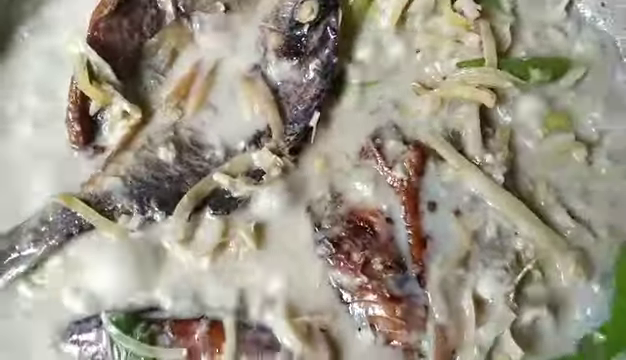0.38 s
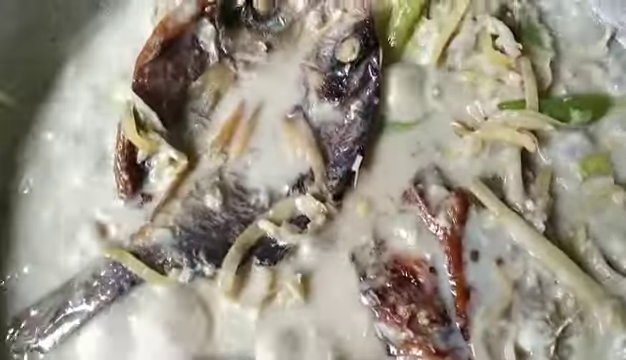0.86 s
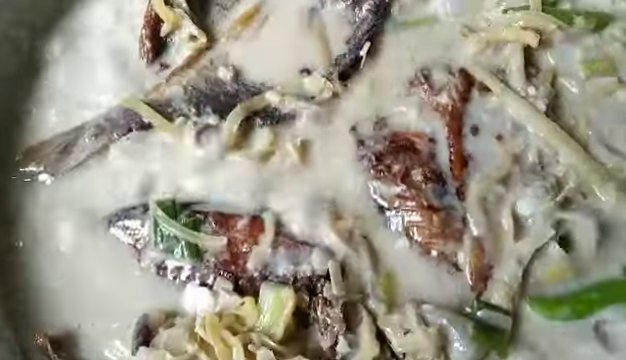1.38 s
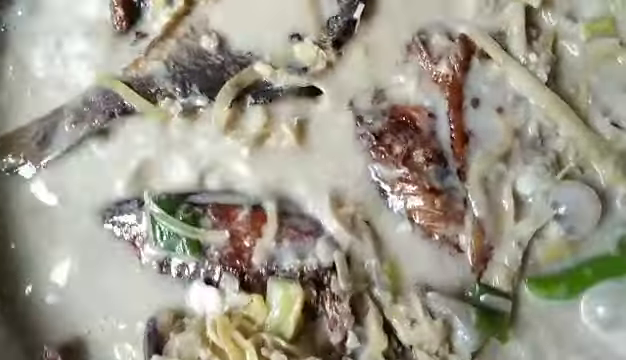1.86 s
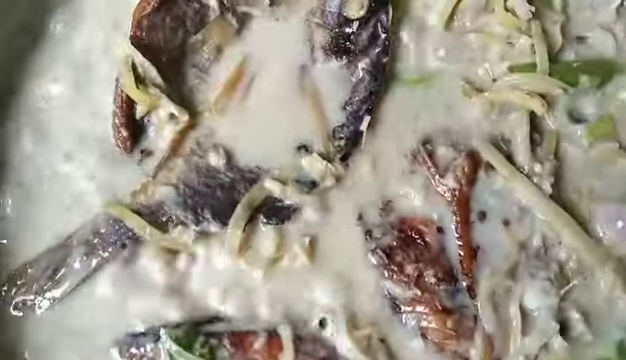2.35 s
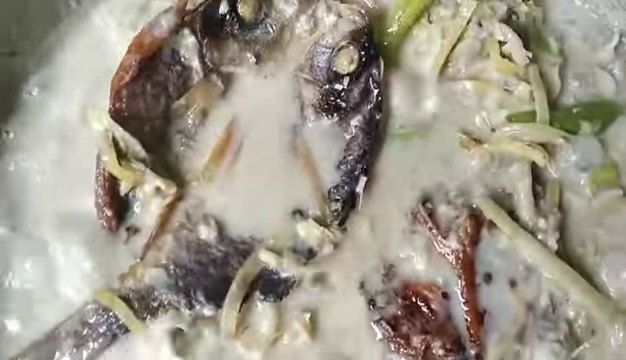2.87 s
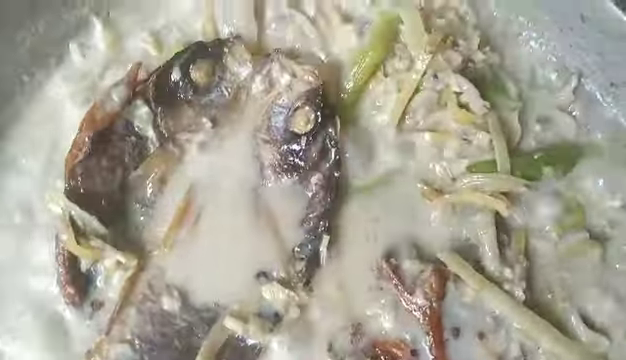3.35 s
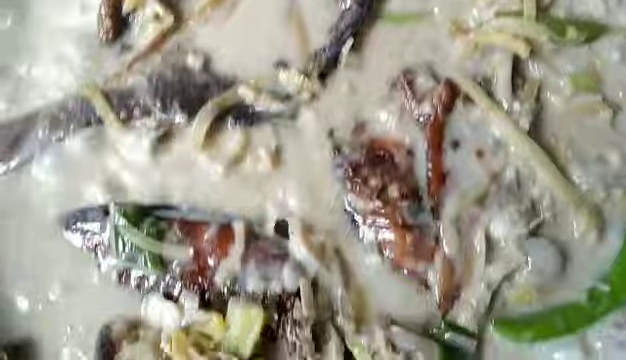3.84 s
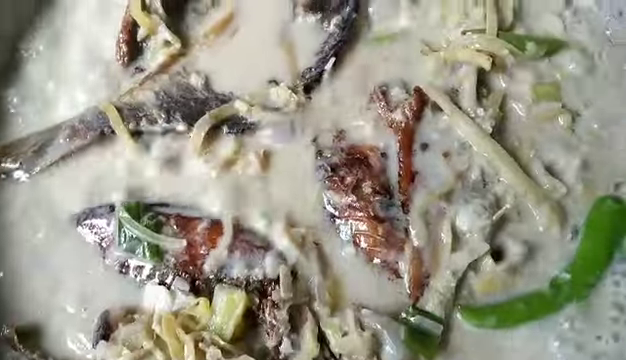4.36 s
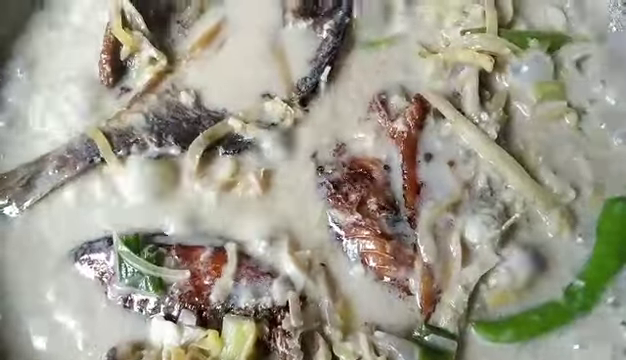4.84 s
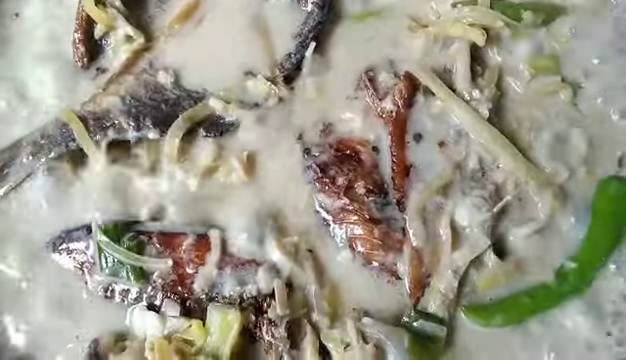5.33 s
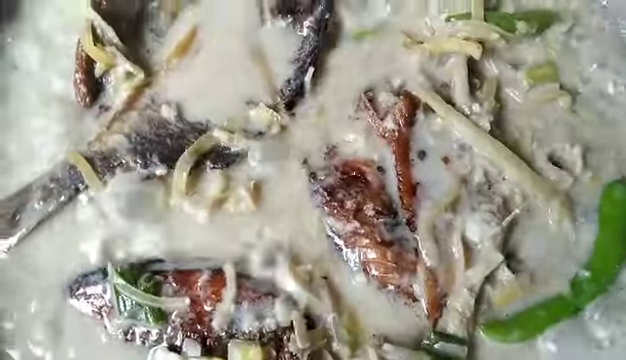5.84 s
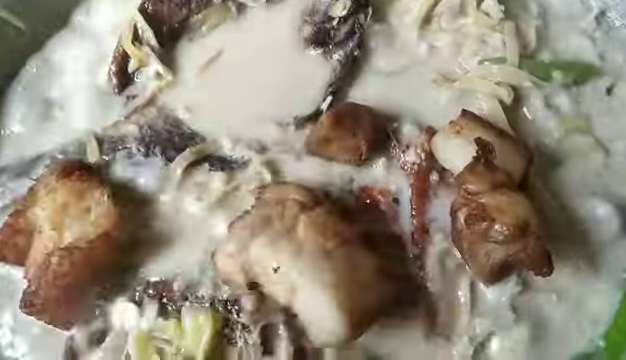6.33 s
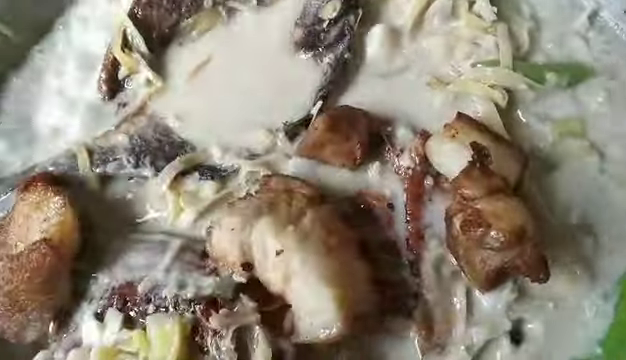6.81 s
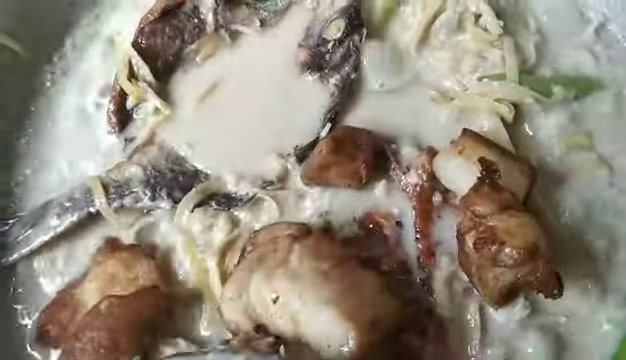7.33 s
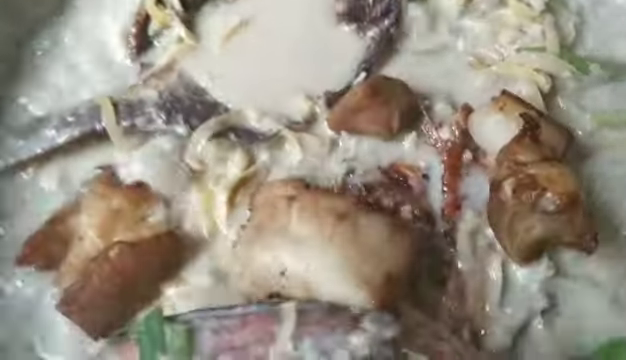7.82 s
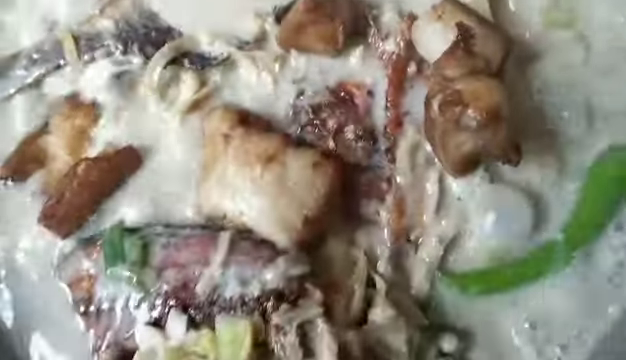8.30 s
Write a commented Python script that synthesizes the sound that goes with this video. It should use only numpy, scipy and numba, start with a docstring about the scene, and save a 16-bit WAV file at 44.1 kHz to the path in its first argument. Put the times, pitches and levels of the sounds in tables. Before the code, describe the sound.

A steady sizzling simmer of fat gurgling bubbles and wet pops over a low burner roar, opening with metallic clinks and squeaks, broken by two tiny gaps.

```python
"""Fat bubbles gurgle in a thick sauce in a wide metal pan, heard close up in three shots split by silences:
decaying sines for the bubbles, snaps and pops, short noise for ticks and spray. Swarms of tiny sines make
gurgle, fizz and steam; noisy tones whistle from vents. Below lie a burner's roar (resonant noise) and a
mains hum (sine). In the first shot utensils clink (noise through metal modes) and squeal in a kitchen."""
import sys
import numpy as np
from scipy import signal
from scipy.fft import rfft, irfft, next_fast_len
from scipy.io import wavfile
from scipy.ndimage import uniform_filter1d
from numba import njit

SR = 44100
rng = np.random.default_rng(int(sys.argv[2]) if len(sys.argv) > 2 else 0)


def transcribe(signal):
    """Save signal, clipped to [-1, 1], as a 16-bit WAV file at the path in sys.argv[1]."""
    frames = np.atleast_2d(signal).T
    limited = np.clip(frames, -1, 1)
    pcm = np.round(limited * 32767).astype(np.int16)
    wavfile.write(sys.argv[1], SR, pcm)


def level_to_linear(level):
    """Convert decibel levels to linear amplitude factors, elementwise."""
    exponent = np.asarray(level, float) / 20
    return 10 ** exponent


N = 383229
T = np.arange(N) / SR

# audible stretches: start/s, end/s
SHOTS = [(0, 1.349), (1.451, 6.066), (6.131, 8.69)]
# depth of narrow streaks in the swarms: gurgle/dB, fizz/dB, steam/dB
STREAK_DB = (1.7, 3.0, 3.4)


def level(x, db):
    """Scale to an rms level."""
    return x * level_to_linear(db) / np.sqrt(np.mean(x ** 2))


def shape(x, gain):
    """Filter by a gain that is a function of frequency."""
    size = next_fast_len(len(x))
    hz = np.maximum(np.arange(size // 2 + 1) * SR / size, 1)
    return irfft(rfft(x, size) * gain(hz), size)[:len(x)]


def band(lo_hz, hi_hz, order=4):
    """Gain of a band-pass with soft skirts."""
    return lambda hz: 1 / np.sqrt((1 + (lo_hz / hz) ** (2 * order)) * (1 + (hz / hi_hz) ** (2 * order)))


def walk(rate_hz):
    """Random levels held 1 / rate_hz and slewed twice; spread near 1."""
    k = int(SR / rate_hz)
    steps = np.repeat(rng.standard_normal(N // k + 1), k)
    return 1.64 * uniform_filter1d(uniform_filter1d(steps, k), k)[:N]


def by_shot(values):
    """Join one value or curve per shot; zero between shots."""
    return sum(v * ((T >= a) & (T < b)) for v, (a, b) in zip(values, SHOTS))


@njit
def rings(s, hz, t60_s, size, glide, rise, rate, count):
    """Sum of sines that swell for the share rise of t60; the pitch moves by the share glide over t60."""
    out = np.zeros(count)
    for k in range(len(s)):
        start, steps = int(s[k] * rate), int(t60_s[k] * rate)
        fade, phase = np.exp(-np.log(1000) / steps), 0.
        g = size[k]
        for i in range(min(steps, count - start)):
            out[start + i] += g * min(1., i / (rise * steps)) * np.sin(phase)
            phase += 2 * np.pi * hz[k] * (1 + glide * i / steps) / rate
            g *= fade
    return out


def scatter(lo_hz, hi_hz, mean_db, quarter_range_db, count):
    """Rows of (t/s, level/dB, f/Hz) at random moments."""
    u = rng.random((count, 3)).T
    s = .1 + u[0] * (N / SR - .1)
    db = mean_db + quarter_range_db * 2 * (2 * u[1] - 1)
    hz = lo_hz * (hi_hz / lo_hz) ** u[2]
    return np.transpose([s, db, hz])


def bloops():
    """Fat bubbles in the thick sauce ring low, down 60 dB in 14.5 cycles, with rising pitch."""
    # fat bubbles at set moments: t/s, relative level/dB, f/Hz
    fat = [(0.117, -21.5, 1280), (0.164, -21, 1500), (0.239, -25, 1324), (0.414, -25, 1210),
           (1.081, -20, 1610), (1.235, -23, 1500), (1.276, -36, 1535), (1.577, -33.5, 1520),
           (1.625, -26, 1970), (1.674, -26, 1810), (1.754, -26, 850), (1.892, -19.5, 1750),
           (1.905, -20.5, 1840), (2.075, -29, 1670), (2.217, -29, 1280), (2.632, -27, 1620),
           (2.72, -31, 1640), (2.665, -24, 2500), (2.861, -29, 1340), (3.036, -23.5, 1280),
           (3.088, -27, 1620), (3.222, -32, 1350), (3.384, -30, 1040), (3.452, -30, 1450),
           (3.505, -28, 1250), (3.592, -25, 1670), (3.765, -31, 1620), (3.851, -23, 1410),
           (3.956, -24, 1580), (4.023, -30, 2370), (4.133, -27, 2090), (4.19, -27, 1260),
           (4.442, -27, 1480), (4.461, -27, 1450), (4.542, -26.5, 1800), (4.61, -23, 2500),
           (4.78, -27, 1600), (4.819, -24.5, 1400), (4.912, -23, 1450), (5.022, -31, 1620),
           (5.193, -32, 1570), (5.237, -26, 1030), (5.377, -28, 1470), (5.495, -19.5, 1680),
           (5.577, -23, 1600), (5.604, -29, 1460), (5.697, -28, 1140), (5.712, -24, 1450),
           (5.747, -26, 2280), (6.018, -25, 1560), (6.308, -17, 1520), (6.604, -26, 1300),
           (6.614, -23, 1900), (6.772, -24.5, 1570), (6.425, -25, 760), (7.069, -30, 1990),
           (7.087, -26, 2000), (7.112, -28, 670), (7.144, -28, 1400), (7.216, -25, 1500),
           (7.397, -28.5, 760), (7.739, -29, 1950), (7.333, -25.5, 1230), (7.79, -23.5, 1310),
           (7.864, -20.5, 1570), (7.914, -23, 1790), (7.928, -24, 1980), (7.935, -28, 1800),
           (8.053, -27, 1300), (8.068, -27, 1350), (8.18, -28, 1280), (8.099, -22.5, 1730),
           (8.282, -25, 1260), (8.341, -22.5, 1260), (8.479, -23.5, 1260), (8.523, -30, 770),
           (8.588, -26, 1340), (8.65, -26, 1070)]
    # chance bubbles: low f/Hz, high f/Hz, mean relative level/dB, quarter of level range/dB
    small = (1003, 1650, -33.5, 1)
    s, db, hz = np.vstack([fat, scatter(*small, count=12)]).T
    return rings(s, hz, 14.5 / hz, level_to_linear(db + 4.0), 0.12, 0.12, 1. * SR, count=N)


def snaps():
    """Thick skins snap in a cycle or two at the bubble's pitch and leave a wet tail of noise around it."""
    # snapping skins: t/s, relative level/dB, f/Hz
    skins = [(6.3901, -15, 2200), (6.4688, -11, 2300), (8.001, -12, 1450), (4.4110, -26, 1400),
             (4.4165, -28, 1500), (6.309, -23, 1500), (6.402, -21, 1800), (6.462, -22, 1700),
             (6.605, -24, 2000), (6.773, -27, 2000), (6.842, -23, 2200), (7.115, -24, 900)]
    t60_cycles, tail_db, tail_decay_s = 4.5, -16, .012
    s, db, hz = np.transpose(skins)
    out = rings(s, hz, t60_cycles / hz, level_to_linear(db + 4), -0.1, 0.06, 1. * SR, count=N)
    out = shape(out, band(650, 9000, order=2))
    t = T[:SR // 10]
    for k, noise in enumerate(rng.standard_normal((len(s), len(t)))):
        at = int(s[k] * SR)
        splash = level(shape(noise, band(hz[k] / 2.0, hz[k] * 1.4)), db[k] + tail_db)
        out[at:at + len(t)] += splash * np.exp(-t / tail_decay_s)
    return out


def pops():
    """The skin stretches with a swelling hiss, bursts in a few cycles at its pitch and leaves a spray."""
    # bursting bubbles at set moments: t/s, relative level/dB, f/Hz
    bursting = [(1.5857, -18, 5500), (1.785, -22, 2240), (1.9785, -16.5, 6300), (2.1359, -20, 5270),
                (2.526, -21, 5940), (2.7196, -29, 3900), (2.737, -14.5, 4300), (4.8905, -22.5, 4170),
                (5.0498, -27, 4940), (5.1005, -23, 4300), (5.1933, -22, 2040), (6.4722, -21, 5000),
                (7.1177, -13, 5200), (7.7476, -36, 4560), (7.7662, -8.5, 3960), (7.776, -18, 4200),
                (7.9257, -18, 5100), (8.1518, -22, 4730), (8.2745, -17, 7550), (8.2967, -11, 4600),
                (8.2985, -23, 3020), (8.6634, -22, 4930)]
    # chance pops: low f/Hz, high f/Hz, mean relative level/dB, quarter of level range/dB
    small = (2398, 9593, -25, 1)
    spray_t60_s, swell_s = 0.05, 0.0064
    s, db, hz = np.vstack([bursting, scatter(*small, count=12)]).T
    out = rings(s, hz, 5.7 / hz + 0.0045, level_to_linear(db + 4.0), 0.14, 0.17, 1. * SR, count=N)
    noise = rng.standard_normal((len(s), SR // 4))
    lead = SR // 20
    t = T[:SR // 4] - lead / SR  # zero at the burst
    swell = level_to_linear(-2.0) * np.exp(np.minimum(t, 0) / swell_s)
    fade = np.where(t < 0, swell, np.exp(-np.log(1000) * t / spray_t60_s))
    for k in range(len(s)):
        colour = band(hz[k] / 1.4, min(hz[k] * 1.17, 10200), order=4)
        spray = level(shape(noise[k], colour), db[k] - 13.5) * fade
        at = int(s[k] * SR) - lead
        out[at:at + SR // 4] += spray[:N - at]
    return out


def ticks():
    """Tiny bubbles burst in one dry tick: about a millisecond of noise around the bubble's pitch."""
    # bursting tiny bubbles: t/s, peak/dB, f/Hz
    tiny = [(1.8340, -15, 9800), (1.8778, -19, 5600), (2.0612, -20, 9600), (2.217, -15, 8800),
            (2.399, -16.5, 9400), (3.103, -11, 9500), (3.3737, -20, 8900), (3.5957, -16, 9250),
            (5.374, -19, 7900), (5.582, -16, 8400), (5.7572, -20, 9800), (5.9682, -18, 9600),
            (6.2003, -18, 9420), (6.2453, -15, 9700), (6.781, -22, 9150), (7.2328, -19, 8380),
            (7.765, -13, 9300), (7.9465, -31, 5000), (7.957, -24, 5000), (8.0994, -18.5, 9260),
            (8.1995, -31, 4800), (8.1125, -20.5, 8500), (8.208, -15.5, 8900), (8.282, -15.5, 6300),
            (8.4924, -17, 8750)]
    decay_s = 0.00087
    t = T[:SR // 100]
    out = np.zeros(N)
    for (s, db, hz), noise in zip(tiny, rng.standard_normal((len(tiny), len(t)))):
        tick = shape(noise * t * np.exp(-t / decay_s), band(hz / 1.15, hz * 1.15))
        at = int(s * SR)
        out[at:at + len(t)] += level_to_linear(db) * tick / np.abs(tick).max()
    return out


def gurgle():
    """Low swarm of tiny bubbles in the sauce."""
    # low f/Hz, high f/Hz, grains/s, t60/4.03 cycles, size spread/dB, noise less 5/dB, patchiness/dB
    low_swarm = (805, 2519, 400, 5.5, 2.8, 3.5, 1.7)
    return bubbles(*low_swarm, STREAK_DB[0])


def fizz():
    """Middle swarm: fizzing froth."""
    # low f/Hz, high f/Hz, grains/s, t60/4.03 cycles, size spread/dB, noise less 5/dB, patchiness/dB
    middle_swarm = (2494, 5958, 1500, 5.5, 0.5, -2.5, 0.5)
    return bubbles(*middle_swarm, STREAK_DB[1])


def steam():
    """High swarm: hissing steam."""
    # low f/Hz, high f/Hz, grains/s, t60/4.03 cycles, size spread/dB, noise less 5/dB, patchiness/dB
    high_swarm = (6750, 13160, 2500, 5.2, 7.5, 7.5, 1.8)
    return bubbles(*high_swarm, STREAK_DB[2])


def bubbles(lo_hz, hi_hz, grains_per_s, decay, spread_db, noise_db, patchy_db, streak_db):
    """A swarm of tiny bubbles, a few loud and many faint, over the blur of far ones."""
    u = rng.random((int(round(grains_per_s, -2) * N / SR), 3)).T
    hz = 0.806 * lo_hz * (1.432 * hi_hz / lo_hz) ** u[1]
    size = level_to_linear(-spread_db * np.log(np.maximum(u[2], .005)))
    near = rings(u[0] * N / SR, hz, 4.03 * decay / hz, size, 0.13, 0.67, 1. * SR, count=N)
    far = level(rng.standard_normal(N), noise_db + 5.0)
    mix = shape(shape(level(near, 0) + far, band(lo_hz, hi_hz)), pan_colour)
    # broad random patches, then narrow random streaks
    mix = patchy(mix, patchy_db, size=512, bins=6, frames=9)
    mix = patchy(mix, streak_db, size=1024, bins=2, frames=3)
    return level(mix, 0)


def patchy(x, patchy_db, size, bins, frames):
    """Level wanders at random in patches of pitch and time."""
    z = signal.stft(x, nperseg=size)[2]
    field = rng.standard_normal(z.shape)
    for _ in range(2):
        field = uniform_filter1d(uniform_filter1d(field, bins, axis=0), frames, axis=1)
    return signal.istft(z * level_to_linear(patchy_db * field / field.std()), nperseg=size)[1][:N]


def pan_colour(hz):
    """Gain of pan, room and microphone, interpolated over log frequency."""
    # f/Hz, relative gain/dB
    colour = [(53, -71), (90, -50), (108, -14), (247, -15), (302, 1.5), (378, -23), (453, -7), (651, -9.5),
              (797, -17), (1620, -12.5), (2730, -12.5), (4170, -6), (9360, 3), (10200, -0.5), (10700, -16),
              (11200, -30), (14600, -60.5), (22000, -120)]
    f, db = np.transpose(colour)
    return level_to_linear(np.interp(np.log(hz), np.log(f), db))


def opening(excess_db):
    """Level in dB of the fade-in, the loud stretch and the drop after each join."""
    # start/s, fade length/s, drop/s
    joins = [(1.451, 0.29, 1.97), (6.13, 0.19, 6.63)]
    fade_from_db, drop_length_s = -13.5, 0.0054
    total_db = 0
    for s, fade, drop in joins:
        times = [s, s, s + fade / 4, s + fade, drop, drop + drop_length_s]
        rise_db = [fade_from_db + excess_db, fade_from_db / 2 + excess_db, excess_db]
        total_db = total_db + np.interp(T, times, [0, *rise_db, excess_db, 0])
    return total_db


def boil_levels():
    """Slow level, opening, boil-ups, surges (shared by fizz and steam) and each layer's own flicker, in dB."""
    # slow levels, one list a shot: t/s, level/dB
    roar_curve, gurgle_curve = [
        [(0, -41.5), (.27, -38.5), (.4, -41), (.7, -46), (1.0, -41), (1.35, -42)],
        [(2.0, -47), (2.12, -41), (2.25, -42), (2.4, -40.5), (2.9, -46), (3.15, -42.5), (3.45, -43.5),
         (3.6, -42), (4.0, -45), (4.45, -44), (4.7, -42), (4.95, -46), (5.1, -43.5), (5.25, -46), (5.6, -45),
         (5.9, -41), (6.07, -42)],
        [(6.6, -51.5), (6.68, -49), (7.0, -42), (7.3, -44), (7.5, -46.5), (7.65, -42.5), (8.1, -43.5),
         (8.69, -43)],
    ], [
        [(0.0, -38.5), (1.164, -40.5), (1.34, -39.5)],
        [(2.0, -44.5), (2.36, -45), (2.65, -43.5), (5.14, -41.5), (5.83, -43), (6.05, -42.5)],
        [(6.66, -43.5), (6.84, -44), (7.91, -41), (8.32, -42), (8.69, -41.5)],
    ]
    sizzle_curve = [
        [(0.0, -35.5), (0.17, -37.5), (1.006, -38), (1.19, -37), (1.3, -36.5)],
        [(2.0, -37.5), (2.2, -36), (2.83, -35), (3.79, -34), (4.05, -38), (4.27, -39.5), (5.2, -35),
         (5.62, -35), (5.9, -36), (6.02, -35)],
        [(6.66, -37), (7.37, -33.5), (7.7, -36.5), (8.15, -31.5), (8.32, -37), (8.66, -33.5)],
    ]
    # level over the sizzle, one a shot: level/dB
    fizz_over, steam_over = [0, -3.5, -5], [-2, -3.5, -4]
    # froth boils up or settles for a moment: middle t/s, length/s, gurgle/dB, sizzle/dB
    boil_ups = [(0.262, .05, -2.5, -3), (1.04, 0.1, -1.5, 4.5), (1.576, 0.021, 8.5, -4),
                (1.916, 0.054, 0, 3.5), (2.11, 0.069, -1, 2.5), (2.597, 0.16, 0, 2.5), (4.35, 0.044, 0, 4),
                (4.603, 0.14, -2, 2), (5.11, 0.052, 3.5, 2), (6.032, 0.048, 1.5, 2), (6.335, 0.086, 6, 5),
                (6.48, 0.04, 0, 5), (6.587, 0.13, -3, 1), (6.802, 0.074, 7, 1.5), (7.163, 0.23, 6, 1),
                (7.418, 0.088, 2, 3), (7.573, 0.026, 3, 2), (7.778, 0.028, 6.5, 6), (8.116, 0.073, 7, 1),
                (8.232, 0.11, -5, 0.5), (8.306, 0.049, 7, 4.5)]
    # excess before the drop: roar/dB, gurgle/dB, fizz/dB, steam/dB
    excess = (8.6, 5.75, 4.8, 4.3)
    # spread of surges and of flicker: roar/dB, gurgle/dB, fizz/dB, steam/dB
    surge_spread, flicker_spread = (1, 0.88, 0.83, 0.81), (1.44, 0.8, 0.79, 0.87)
    surge_hz, flicker_hz = 7.6, 25

    roar_db, gurgle_db, sizzle_db = (by_shot([np.interp(T, *np.transpose(rows)) for rows in curve])
                                     for curve in (roar_curve, gurgle_curve, sizzle_curve))
    for s, length, gurgle_up_db, sizzle_up_db in boil_ups:
        bump = np.exp(-(2 * (T - s) / length) ** 2)
        gurgle_db = gurgle_db + gurgle_up_db * bump
        sizzle_db = sizzle_db + sizzle_up_db * bump
    slow = roar_db, gurgle_db, sizzle_db + by_shot(fizz_over), sizzle_db + by_shot(steam_over)
    audible = by_shot([1, 1, 1]) > 0
    surges = [walk(surge_hz) for _ in range(3)]
    surges.append(surges[-1])
    levels = []
    for db, up_db, surge_db, surge, flicker_db in zip(slow, excess, surge_spread, surges, flicker_spread):
        base_db = np.where(audible, db, -60) + opening(up_db)
        levels.append(base_db + surge_db * surge + flicker_db * walk(flicker_hz))
    return levels


def whistle(rows, orders, blur_hz, breath):
    """A tone on a pitch curve; the share breath is noise spread about blur_hz either side of the pitch."""
    s, hz, db = np.transpose(rows)
    span = slice(max(int(s[0] * SR), 0), int(s[-1] * SR))
    t = T[span]
    phase = np.cumsum(np.interp(t, s, hz)) * 2 * np.pi / SR
    share = np.clip(breath, 0, 1)
    tone = 0
    for k, order_db in [(0.99, 0.0031)] + orders:  # frequency ratio, dB
        blur = band(.1, k * blur_hz, order=2)
        a, b = (level(shape(rng.standard_normal(SR), blur), -4.5)[:len(t)] for _ in range(2))
        in_phase = (np.sqrt(1 - share) + np.sqrt(share) * a) * np.sin(k * phase)
        quadrature = np.sqrt(share) * b * np.cos(k * phase)
        tone = tone + level_to_linear(order_db) * (in_phase + quadrature)
    out = np.zeros(N)
    edges = np.clip(np.minimum(t - s[0], s[-1] - t) / 0.006, 0, 1)
    out[span] = np.sqrt(2) * tone * edges * level_to_linear(np.interp(t, s, db))
    return out


def chirps():
    """Steam escapes through small holes as breathy tones of gliding pitch."""
    # one list a chirp: t/s, nominal f/Hz, relative level/dB
    holes = [
        [(2.84, 3970, -38), (2.865, 3900, -40), (2.89, 3730, -44)],
        [(2.88, 3050, -40), (2.94, 3394, -45), (3.0, 3640, -41)],
        [(3.89, 3540, -43), (3.93, 3480, -36), (3.97, 3640, -45)],
        [(5.565, 5600, -44), (5.585, 5550, -34), (5.6, 5260, -44)],
        [(5.635, 4520, -42), (5.65, 4330, -36), (5.675, 4220, -36), (5.7, 3860, -44), (5.725, 3600, -41)],
        [(1.235, 2350, -50), (1.28, 2660, -37), (1.325, 2800, -45)],
    ]
    return sum(whistle(rows, [], 140, .85) for rows in holes)


def puff():
    """Steam escapes through a wide vent as a broad band of noise that moves in pitch."""
    # t/s, nominal centre f/Hz, relative level/dB
    vent = [(5.56, 5890, -39), (5.6, 5400, -28.5), (5.635, 4595, -30), (5.67, 3985, -39), (5.73, 3430, -59)]
    return whistle(vent, [], 1500, 1.0)


def roar():
    """Burner turbulence and deep boiling excite broad resonances that flutter each on their own."""
    # air in pan and stove: f/Hz, width/Hz, relative level/dB
    resonances = [(209.3, 52, -14), (310.6, 29.5, -2), (343.3, 42, -3.5), (451, 79, -7), (615, 48, -7.5),
                  (781, 27, -14.5)]
    out = level(shape(shape(rng.standard_normal(N), band(90, 800)), pan_colour), -6.5)
    for hz, width, db in resonances:
        one = shape(rng.standard_normal(N), lambda f: 1 / np.sqrt(1 + (2 * (f - hz) / width) ** 4))
        out = out + level(one, db - 4.5) * level_to_linear(1.53 * walk(9.8))
    return level(out, 0)


def rim_echo(low):
    """With the phone at another height in the last shot, the rim's echo cancels one band and lifts the next."""
    # f/Hz, width/Hz, gain/dB
    bands = [(501, 94, -8), (747, 240, 7)]

    def gain(f):
        return level_to_linear(sum(db / (1 + (2 * (f - hz) / width) ** 4) for hz, width, db in bands))

    return np.where(T > SHOTS[-1][0], shape(low, gain), low)


def hum():
    """Mains hum: one sine whose level wanders."""
    hum_hz, mean_rms_db = 121.9, -67
    return np.sqrt(2) * level_to_linear(mean_rms_db + 1.5 * walk(3.78)) * np.sin(2 * np.pi * hum_hz * T)


def clinks():
    """Rough contact swells and dies; it is heard as a scratch and through the damped modes of the metal."""
    # blows and scrapes: t/s, relative level/dB, tilt/(dB/octave), rise/s, fall/s, factor on mode widths
    blows = [(0.001, -28, 4.5, 0.0007, 0.013, 1.9), (0.424, -15.5, 4, 0.0012, 0.017, 1.1),
             (.455, -20.5, -5, 0.0021, 0.025, 1.6), (0.591, -32, 0, 0.085, 0.1, 3.4),
             (0.7, -23.5, -0.5, 0.041, 0.022, 2.5)]
    # modes of the metal: f/Hz, width/Hz before that factor, relative level/dB
    modes = [(1880, 37, -3), (2200, 82, -3.5), (2800, 92, 4), (3220, 115, 0.5), (4070, 97, -2),
             (4800, 38, 3.5), (5200, 43, -6), (5500, 25, 3), (6300, 32, -12.5), (6840, 28, -13.5),
             (7040, 31, -19), (8100, 32, 5), (7950, 31, -15), (8900, 30, -2), (9500, 210, -5.5),
             (9160, 17, -24)]
    t = T[:SR // 2]
    out = np.zeros(N)
    for s, db, tilt_db, rise, fall, damping in blows:
        push = np.minimum(t / rise, 1) ** 2 * np.exp(-np.maximum(t - rise, 0) / fall)
        contact = rng.standard_normal(len(t)) * level_to_linear(1.5 * rng.standard_normal(len(t))) * push
        # every blow lands on another spot and favours other modes
        spot_db = 1.5 * rng.standard_normal(len(modes))

        def metal(f):
            ringing = sum(level_to_linear(d + e) / (1 + 2j * (f - hz) / (w * damping))
                          for (hz, w, d), e in zip(modes, spot_db))
            scratch = level_to_linear(-9.5)
            return (ringing + scratch) * level_to_linear(tilt_db * np.log2(f / 3000)) * band(1400, 11000)(f)

        at = int(s * SR)
        out[at:at + len(t)] += level_to_linear(db + 4.5) * shape(contact, metal)
    return out


def squeals():
    """Rubbed metal squeals on wandering pitches; an arching squeal adds its octave and fourth partial."""
    # one list a squeal: t/s, nominal f/Hz, relative level/dB
    steady = [
        [(0.0, 1940, -27), (0.018, 1907, -30.5), (0.054, 1930, -36), (0.12, 1910, -31.5), (0.14, 1910, -39),
         (0.22, 1880, -32), (0.25, 1880, -43), (0.275, 1880, -54)],
        [(0.29, 1830, -47), (0.302, 1850, -33), (0.322, 1880, -40), (0.345, 2000, -40.5), (0.375, 1930, -50)],
        [(0.86, 1860, -57), (0.876, 1990, -40), (0.9, 1880, -45), (0.93, 2120, -50)],
    ]
    # arching squeal: t/s, nominal f/Hz, relative level/dB, octave's relative level/dB
    arch = [(.985, 1590, -48, -50), (1.025, 1640, -40, -46), (1.05, 1930, -35, -41), (1.1, 2000, -34, -37),
            (1.14, 2042, -37, -45), (1.185, 1920, -37.5, -42), (1.22, 1560, -34, -47),
            (1.29, 1524, -38.5, -58), (1.34, 1514, -54, -65.5)]
    out = sum(whistle(rows, [], 30, .3) for rows in steady)
    octave = [(s, 2 * hz, db) for s, hz, _, db in arch]
    fourth_partial = (2, -4)  # ratio to the octave, dB
    return out + whistle([r[:3] for r in arch], [], 80, .65) + whistle(octave, [fourth_partial], 110, .75)


def struck_ring():
    """Fading ring of a utensil struck just before the start."""
    # nominal f/Hz, relative level/dB
    partials = [(2993, -48), (3262, -43), (4124, -47), (5090, -45), (8113, -49)]
    end_s = .25
    return sum(whistle([(-.02, hz, db), (end_s, hz, db - 2.0)], [], 35, .55) for hz, db in partials)


def kitchen(x, wet_db):
    """Hard walls return a short, dense tail."""
    t60_s = 0.099
    t = T[:SR // 2]
    decay = np.exp(-np.log(1000) * t / t60_s) * (t > .004)
    tail = level(rng.standard_normal(len(t)) * decay, 0)
    return x + level_to_linear(wet_db) * signal.fftconvolve(x, tail / np.sqrt(len(t)))[:N]


def scene():
    """All layers on their levels, heard alike on both channels."""
    roar_db, gurgle_db, fizz_db, steam_db = boil_levels()
    swarms = level_to_linear(gurgle_db) * gurgle() + level_to_linear(fizz_db) * fizz() + level_to_linear(steam_db) * steam()
    pan = swarms + level_to_linear(roar_db) * rim_echo(roar())
    close = bloops() + snaps() + pops() + ticks() + chirps() + puff() + squeals() + struck_ring()
    events = kitchen(close, wet_db=-7) + kitchen(clinks(), wet_db=-1)
    mono = pan + hum() + shape(events, band(50, 9970, order=24))
    return np.array([mono, mono])


def top_cut(x):
    """Nothing passes above the cut-off."""
    return signal.sosfilt(signal.butter(12, 11380, fs=SR, output="sos"), x)


def record(dry):
    """The phone cuts bass and top steeply and adds low noise; silence separates the shots."""
    on = uniform_filter1d(1. * sum((T >= a) & (T < b) for a, b in SHOTS), size=60)
    cut = signal.sosfilt(signal.ellip(8, .2, 60, 11150, fs=SR, output="sos"), dry)
    cut = signal.sosfilt(signal.butter(4, 105, "high", fs=SR, output="sos"), cut)
    microphone_noise = level(shape(rng.standard_normal(N), band(55, 121.5, order=1)), -80.5)
    return top_cut((cut + microphone_noise) * on)


dry = scene()
out = record(dry)
transcribe(out)
```